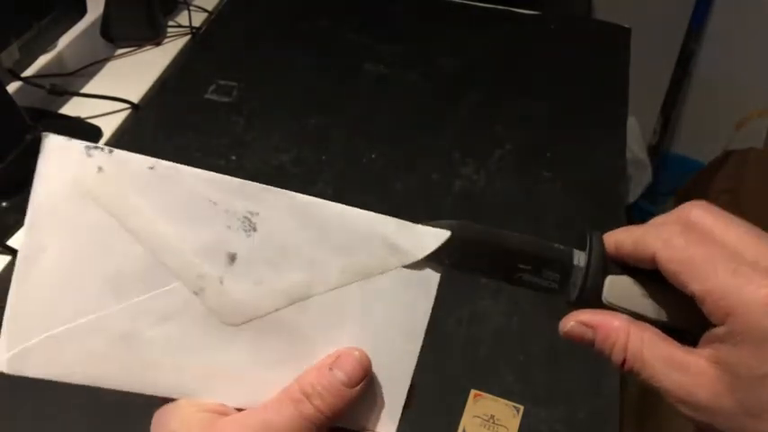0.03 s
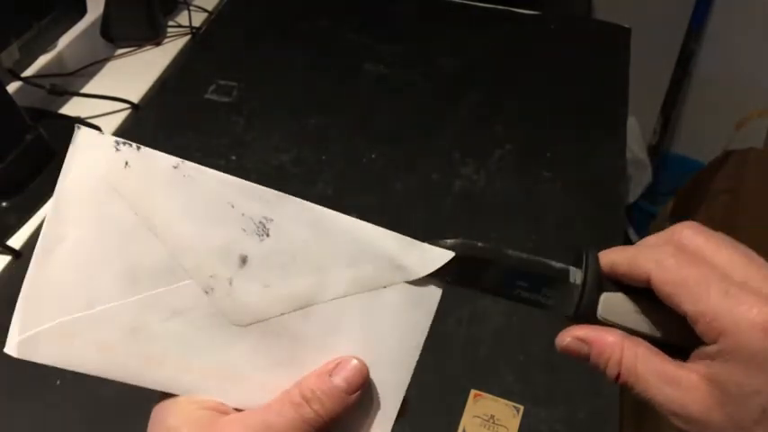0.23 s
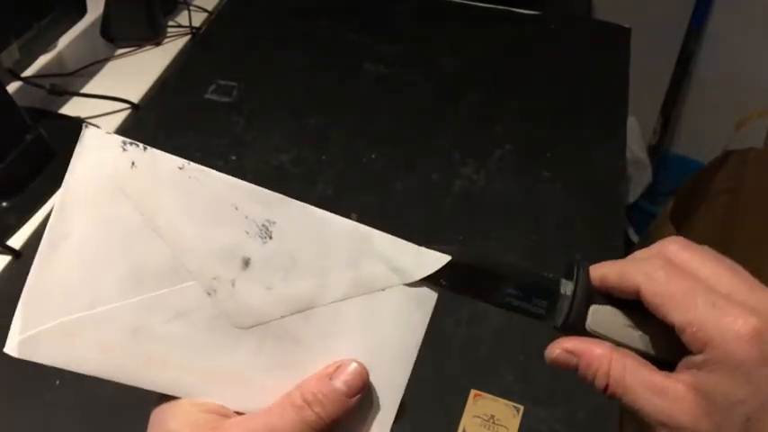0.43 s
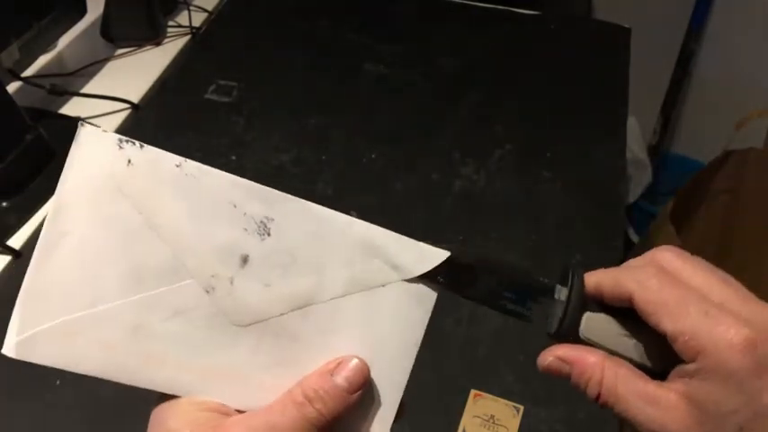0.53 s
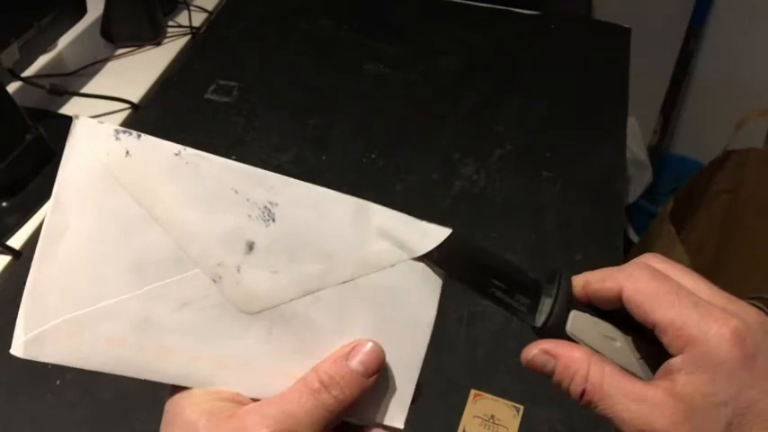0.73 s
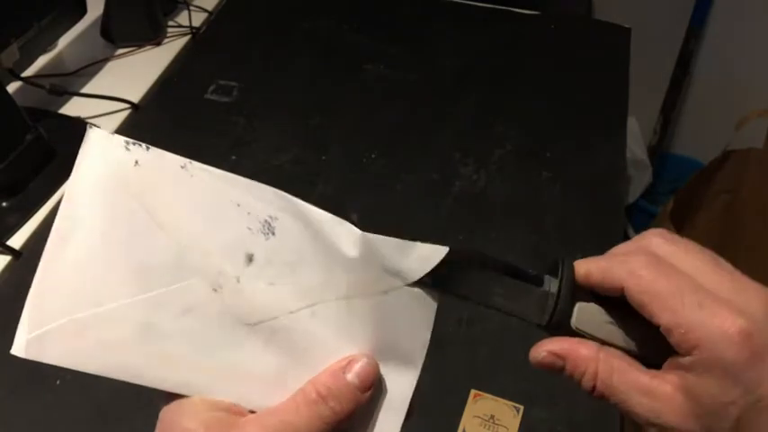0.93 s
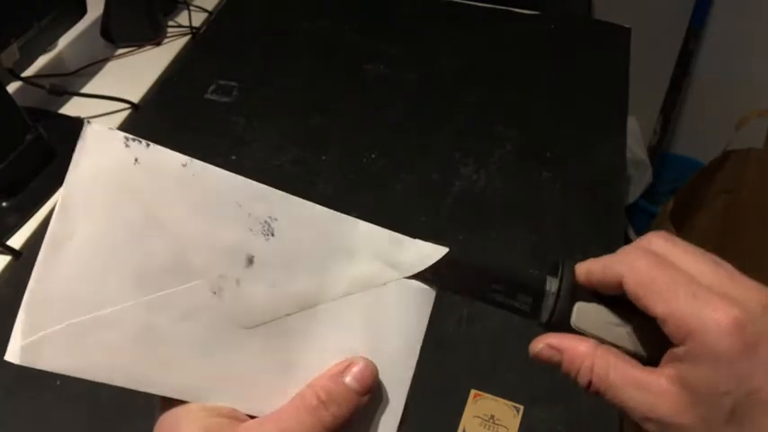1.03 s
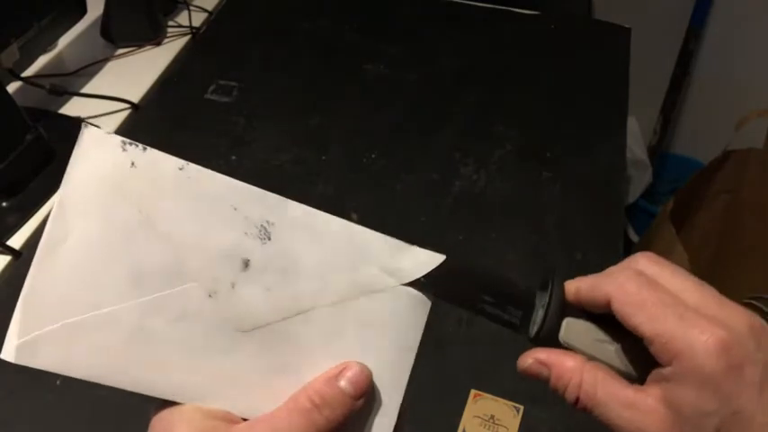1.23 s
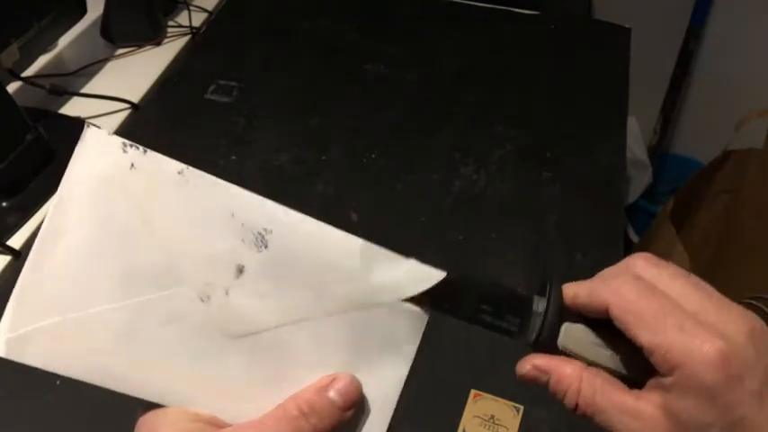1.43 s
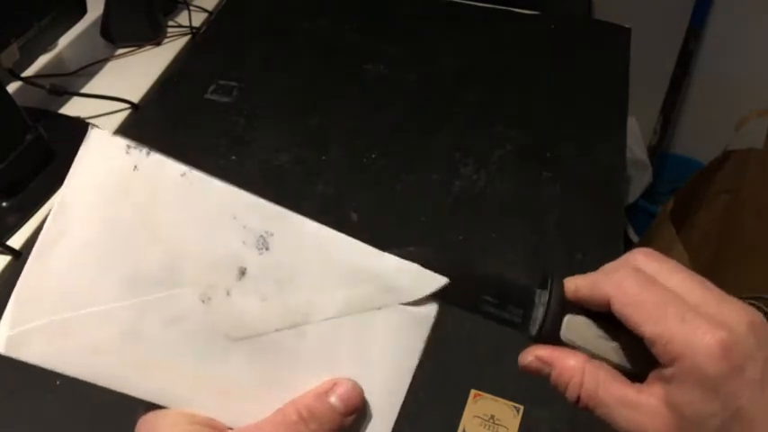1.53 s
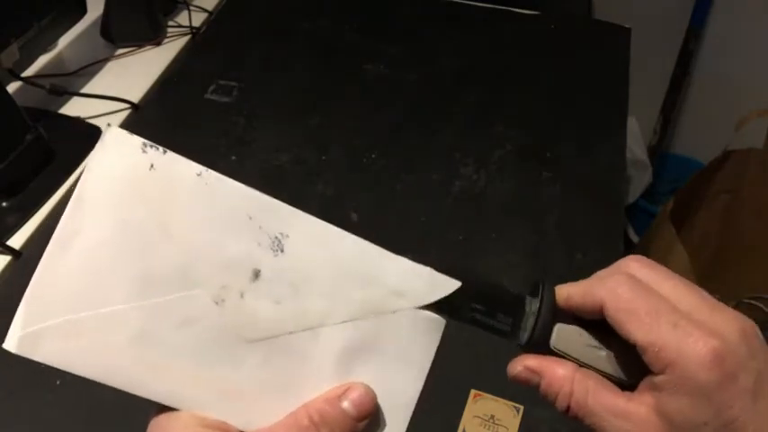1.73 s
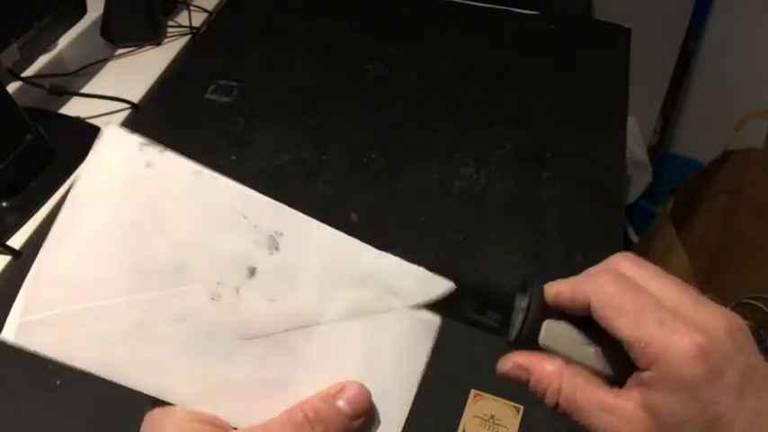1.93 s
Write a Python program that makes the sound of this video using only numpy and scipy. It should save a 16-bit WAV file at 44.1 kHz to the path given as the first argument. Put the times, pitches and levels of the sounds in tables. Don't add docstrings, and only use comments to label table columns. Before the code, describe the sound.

A paper envelope is cut open with a knife, close and dry. Faint scrapes and high ticks come in the first 0.7 s, a fuller scrape and pop at 0.9, a small crack at 1.16, sharp ticks at 1.4. The loud, dense rip bursts at 1.6 with hollow thumps, then lighter tears and pops until 1.85. Quiet small room, soft hiss, faint low machine hum.

```python
import sys
import numpy as np
from scipy import signal
from scipy.fft import rfft, irfft, next_fast_len
from scipy.io import wavfile
from scipy.ndimage import map_coordinates

SR = 44100
rng = np.random.default_rng(int(sys.argv[2]) if len(sys.argv) > 2 else 0)


def put_to_file(sound):
    columns = np.atleast_2d(sound).T
    safe = np.clip(columns, -1, 1)
    whole_steps = np.round(safe * 32767)
    wavfile.write(sys.argv[1], SR, whole_steps.astype(np.int16))


def rack_gain(trim_db):
    fader = np.asarray(trim_db, float)
    return 10 ** (fader / 20)


N = 88200

# (f/Hz, level/dB)
AIR_TONE = [(15, -63), (32, -2.5), (80, 1.5), (277, 2), (503, -11), (1330, -16), (2990, -24), (9570, -28.5),
            (16000, -31)]
# (f/Hz, width/Hz, level/dB)
HUM = [(90.4, 20, -68.5), (218.9, 9.6, -70), (284.2, 6.5, -65.5), (344, 22, -69), (432, 9.4, -74.5),
       (599, 110, -71.5)]
# (f/Hz, t60/s)
WALL_DECAY = [(200, 0.39), (2000, 0.27), (10000, 0.18)]
# (f/Hz, width/Hz, level/dB)
POCKET_TONE = [(209.4, 82, -6), (340.5, 42, -2), (442, 86, -9.5)]
# (f/Hz, width/Hz, level/dB)
SHEET_TONE = [(321, 305, -2), (700, 410, -11.5), (1060, 580, -4), (1540, 810, -3.5), (2300, 440, -7.5)]
# (f/Hz, width/Hz, level/dB)
SCRAPE_TONE = [(3230, 2200, -10), (4500, 1340, 0), (6180, 570, 2.5), (9300, 1800, 2.5), (11200, 4600, -9),
               (14200, 10000, -13)]
# (f/Hz, width/Hz, level/dB)
TEAR_TONE = [(2900, 2300, -5.5), (4600, 1050, 0), (5600, 490, 0), (6610, 600, 1.5), (8950, 1320, -2.5),
             (12600, 3800, -8)]
# (t/s, level/dB)
SAGS = [
    (.002, 9),
    (.085, 12),
    (.526, 11),
    (1.788, 11),
]
# (t/s, level/dB)
FLAPS = [
    (1.3062, 13),
    (1.39, 6.5),
    (1.58, 13.5),
    (1.598, 13.5),
    (1.607, 13.5),
    (1.623, 17.5),
    (1.639, 9.5),
    (1.668, 2),
    (1.721, -4),
]
# (t/s, peak level/dB, snap f/Hz, level of its thump/dB)
POPS = [(0.0562, -47, 1500, -60), (0.7226, -40, 1710, -66), (.8968, -38.5, 755, -66),
        (0.564, -44.5, 950, -72), (0.73, -42.5, 1300, -36), (0.804, -39, 860, -49),
        (0.899, -23.5, 1430, -45), (0.944, -33, 1250, -35.5), (1.154, -31, 1010, -42.5),
        (1.1634, -20, 1850, -39.5), (1.1665, -22.5, 2000, -31.5), (1.272, -41.5, 1520, -65),
        (1.3022, -32.5, 1410, -44), (1.346, -45.5, 1790, -40), (1.3663, -37.5, 980, -47),
        (1.383, -44, 1530, -35), (1.3892, -36.5, 1480, -60), (1.3931, -33.5, 1430, -60),
        (1.45, -36, 1470, -38.5), (1.4778, -46, 1300, -62), (1.4951, -36, 820, -51),
        (1.5025, -24, 1850, -34.5), (1.562, -30, 1050, -35.5), (1.5967, -24, 1100, -58),
        (1.6097, -18, 1590, -63), (1.6134, -24, 1000, -60), (1.6194, -25, 1920, -58),
        (1.6234, -23.5, 950, -63), (1.628, -20.5, 1750, -58), (1.63, -19, 1150, -65),
        (1.6692, -31.5, 1370, -62), (1.7504, -37.5, 1310, -43), (1.7533, -35, 1600, -62),
        (1.785, -25, 2620, -70), (1.794, -34, 1400, -60), (1.836, -41, 1800, -60),
        (1.8556, -24.5, 1530, -57), (1.914, -38.5, 1020, -41), (1.964, -47.5, 760, -63)]
# (t/s, peak level/dB, f/Hz)
TWANGS = [(.0845, -41.5, 1200), (.0898, -36, 1170), (.5203, -35.5, 1680), (.5258, -39, 1500),
          (.5295, -37.5, 1270), (1.1513, -27.5, 1330), (1.2938, -35.5, 1550), (1.3071, -28, 2150),
          (1.178, -42, 2000), (1.7838, -29.5, 1370), (.886, -47, 1150)]
# (t/s, peak level/dB, f/Hz)
TICKS = [(0.0567, -44, 9600), (.075, -41, 9400), (0.0845, -36, 10000), (0.0905, -31, 9300),
         (0.1035, -33, 9300), (0.1154, -41, 9320), (0.2295, -24, 10600), (0.2384, -32, 10000),
         (0.2405, -32, 10100), (0.2568, -34, 10500), (.2595, -30, 10600), (0.2836, -37, 10400),
         (0.2924, -38, 11000), (0.306, -45, 9860), (0.3935, -33.5, 9900), (0.4073, -27.5, 10200),
         (0.4202, -29, 10000), (0.626, -31, 10840), (0.6654, -43, 6600), (1.0162, -35, 8600),
         (1.0488, -38, 6560), (1.067, -34.5, 8500), (1.0906, -39, 9650), (1.1362, -25, 8600),
         (1.2207, -37.5, 8650), (.9265, -39, 8000), (1.379, -27.5, 10500), (1.3922, -28, 9500),
         (1.4005, -17, 9800), (1.4068, -14, 9400), (1.4155, -29, 9600), (1.5745, -31, 10400),
         (1.5867, -17, 9900), (1.593, -13, 9560), (1.5982, -19, 9500), (1.6245, -10, 9150),
         (1.736, -21, 9300), (1.7615, -37, 9100), (1.4231, -23, 9400), (1.5481, -19.5, 12000),
         (1.7398, -21, 9900), (1.9668, -36.5, 8350)]
# (t/s, peak level/dB, f/Hz)
CRACKS = [(.5215, -44, 4600), (.7215, -34, 4500), (0.8988, -22.5, 4350), (0.944, -31, 4100),
          (1.1632, -26, 4360), (1.3789, -34.5, 6750), (1.3922, -35.5, 5400), (1.4004, -30, 5900),
          (1.4019, -30, 6100), (1.4066, -26.5, 6500), (1.4087, -28.5, 5700), (1.4152, -35, 5600),
          (1.4236, -34, 6100), (1.548, -36, 5000), (1.5745, -30, 4800), (1.5856, -21, 5100),
          (1.5869, -14, 4850), (1.5928, -14.5, 4600), (1.5979, -9.5, 5650), (1.601, -19, 5860),
          (1.6073, -13, 4800), (1.609, -14, 5430), (1.6132, -15, 5060), (1.6162, -13, 5600),
          (1.6184, -10.5, 5600), (1.62, -12, 5750), (1.622, -11, 5530), (1.6245, -11, 5950),
          (1.6281, -9.5, 5500), (1.6308, -15, 4600), (1.6338, -17, 6000), (1.6378, -16, 5900),
          (1.6408, -19, 5000), (1.6432, -23, 6200), (1.695, -24.5, 6300), (1.703, -24, 6500),
          (1.7811, -30, 5200), (1.7875, -32, 5100), (1.794, -34, 5100), (1.8205, -34, 4800),
          (1.8362, -40, 4800), (1.8556, -41, 3470)]
# (peak t/s, rise/s, fall/s, level/dB, sheet over it/dB)
SCRAPES = [(.09, 0.05, 0.042, -63, 11.5), (.225, 0.02, 0.028, -54, -4), (.41, 0.059, 0.09, -60.5, 0),
           (.62, 0.057, 0.064, -59, -1.5), (.85, 0.047, 0.065, -47, -2), (1.07, 0.043, .1, -63, -16),
           (1.14, 0.15, 0.14, -54.5, 2), (1.275, 0.033, 0.068, -58, 4), (1.408, 0.018, 0.037, -44, -3.5),
           (1.392, 0.015, .012, -48.5, 1.5), (1.52, 0.051, 0.067, -50, 1), (1.97, 0.026, 0.11, -62.5, 3.5),
           (.78, 0.092, 0.11, -64.5, 2)]
# (peak t/s, rise/s, fall/s, level/dB, sheet over it/dB)
TEARS = [(.524, 0.013, 0.02, -53, 0), (.721, 0.02, 0.014, -48.5, 0.5), (0.908, 0.09, 0.13, -57, 3.5),
         (1.163, 0.013, 0.014, -47.5, 7), (1.599, 0.0089, 0.051, -28.5, -3.5),
         (1.621, 0.045, 0.043, -25.5, -5), (1.675, 0.031, 0.063, -43.5, -17),
         (1.705, 0.071, 0.072, -39.5, -5.5), (1.787, 0.013, 0.014, -45.5, 7.5),
         (1.82, 0.016, 0.021, -49.5, 3.5), (1.81, 0.035, 0.063, -58.5, 5), (1.37, 0.081, 0.054, -63, -5),
         (1.915, 0.13, 0.032, -65, 6), (.212, 0.019, 0.012, -61, 5), (.452, 0.0091, 0.025, -64.5, 4.5),
         (.612, 0.021, 0.019, -74, 13), (.55, 0.02, 0.014, -80, 21.5)]


def unit(x):
    return x / np.sqrt(np.mean(x ** 2) + 1e-20)


def along(points, hz):
    f, value = np.transpose(points)
    return np.interp(np.log(hz + 1), np.log(f + 1), value)


def filtered(x, response):
    size = next_fast_len(N + SR // 2)
    spectrum = rfft(x, size) * response(np.fft.rfftfreq(size, 1 / SR))
    return irfft(spectrum, size)[:N]


def thin(f, hz):
    return (1j * f / hz / (1 + 1j * f / hz)) ** 3


def peaks(rows):
    def response(f):
        total = 0
        for k, (centre, width, db) in enumerate(rows):
            damping = 1j * f * width
            total = total + (-1) ** k * rack_gain(db) * damping / (centre * centre - f * f + damping)
        return total
    return response


def impulses(rows):
    push = np.zeros(N)
    for s, db in rows:
        push[round(s * SR)] = rack_gain(db)
    return push


def air():
    return rack_gain(-58) * unit(filtered(rng.standard_normal(N), lambda hz: rack_gain(along(AIR_TONE, hz))))


def hum():
    out = rack_gain(-62) * np.sin(2 * np.pi * HUM[0][0] * np.arange(N) / SR)
    for hz, width, db in HUM:
        note = peaks([(hz, width, 0)])
        out = out + rack_gain(db) * unit(filtered(rng.standard_normal(N), lambda f: note(f) ** 2))
    return out


def walls(x):
    hz, t, z = signal.stft(rng.standard_normal(SR // 3), SR, nperseg=256)
    decay = rack_gain(-60 * t / along(WALL_DECAY, hz)[:, None])
    tail = signal.istft(z * decay, SR, nperseg=256)[1]
    return signal.fftconvolve(np.pad(x, (200, 0)), tail / np.linalg.norm(tail))[:N]


def pocket():
    pop_pushes = [(s - .001, thump_db + 45.5) for s, _, _, thump_db in POPS]
    push = impulses([*pop_pushes, *FLAPS])
    thump = filtered(push, lambda f: peaks(POCKET_TONE)(f) * thin(f, 54) / (1 + 1j * f / 900))
    return thump + filtered(impulses(SAGS), lambda f: peaks(POCKET_TONE[:1])(f) ** 2)


def snaps(rows, cycles, grainy, lift_db, colour, lead_db, lead_s):
    out, t = np.zeros(N + SR), np.arange(SR // 50) / SR
    f = np.fft.rfftfreq(len(t), 1 / SR)
    for s, db, hz, *_ in rows:
        noise = rng.standard_normal(len(t))
        envelope = np.exp(-t * hz / cycles) * (1 - np.exp(-1.5 * t * hz))
        ring = (np.sin(2 * np.pi * hz * t) + grainy * noise) * envelope
        ring = irfft(rfft(ring) * colour(f, hz), len(t))
        ring = rack_gain(db + lift_db) * ring / np.abs(ring).max()
        slip_s = s + lead_s * (rng.standard_normal() - .4)
        out[round(s * SR):][:len(t)] += ring
        out[round(slip_s * SR):][:len(t)] -= rack_gain(lead_db) * ring
    return out[:N]


def buckling():
    def dull(f, hz):
        sheet_limit = 1 - (f / 3200) ** 2 + 1j * f / 3000
        return thin(f, 206) / sheet_limit / (1 + 1j * f / (2.0 * hz)) ** 2
    pop = snaps(POPS, cycles=.6, grainy=.7, lift_db=1, colour=dull, lead_db=-24, lead_s=.003)
    twang = snaps(TWANGS, cycles=2.0, grainy=0.64, lift_db=-0.4, colour=dull, lead_db=-10.5, lead_s=.0025)
    return pop + twang


def ticks():
    def bright(f, hz):
        return thin(f, 0.78 * hz) ** 2 / (1 + 1j * f / hz) ** 4.54
    return snaps(TICKS, cycles=1.95, grainy=0.77, lift_db=-7.5, colour=bright, lead_db=-11.5, lead_s=0.0018)


def cracks():
    def broad(f, hz):
        return peaks(TEAR_TONE)(f) + 0.19 * thin(f, 1000)
    return snaps(CRACKS, cycles=1.85, grainy=0.83, lift_db=-3, colour=broad, lead_db=-13, lead_s=0.0012)


def grit(per_s, spread_db, smooth):
    chance, side, size = rng.random((3, N))
    slips = (chance < per_s / SR) * np.sign(side - .5) * rack_gain(-spread_db * np.log(size + .04))
    return unit(unit(slips) + smooth * rng.standard_normal(N))


def crackle(tone, per_s, spread_db, smooth, shared, clump_db):
    clump_rate = 300
    drift = rng.standard_normal(int(N * clump_rate / SR) + 4)
    clumps = rack_gain(clump_db * map_coordinates(drift, [np.arange(N) * clump_rate / SR]))
    common = grit(per_s, spread_db, smooth)
    out = np.zeros(N)
    for hz, width, db in tone:
        slips = clumps * (shared * common + grit(per_s, spread_db, smooth))
        resonance = peaks([(hz, 1.5 * width, 0)])
        out += rack_gain(db) * np.sqrt(width) * unit(filtered(slips, lambda f: resonance(f) ** 2))
    return unit(out)


def strokes(rows, fibres, sheet):
    t, fine, body = np.arange(N) / SR, np.zeros(N), np.zeros(N)
    for s, rise, fall, db, body_db in rows:
        away = np.where(t < s, (s - t) / rise, (t - s) / fall)
        power = rack_gain(2 * db - 47.7 * away ** 1.33)
        fine += power
        body += power * rack_gain(2 * body_db)
    return np.sqrt(fine) * fibres + np.sqrt(body) * sheet


def scrape(sheet):
    fibres = crackle(SCRAPE_TONE, 2700, spread_db=8.0, smooth=1.4, shared=0.7, clump_db=3.5)
    return strokes(SCRAPES, fibres, sheet)


def tear(sheet):
    fibres = crackle(TEAR_TONE, 2500, spread_db=5, smooth=.8, shared=.6, clump_db=.9)
    return strokes(TEARS, fibres, sheet)


def scene():
    sheet = crackle(SHEET_TONE, 3000, spread_db=5.0, smooth=1.0, shared=0.4, clump_db=1.35)
    paper = scrape(sheet) + tear(sheet) + pocket() + buckling() + ticks() + cracks()
    return (paper + rack_gain(-15) * walls(paper) + air() + hum())[None]


def low_pass(x):
    return signal.sosfilt(signal.butter(12, 16810, fs=SR, output="sos"), x)


def record(dry):
    def edge(hz):
        return rack_gain(-59) * (hz < 16600) + 1 / (1 + (hz / 15750) ** 200)
    mix = filtered(dry[0], edge)[None]
    return low_pass(mix)


dry = scene()
out = record(dry)
put_to_file(out)
```